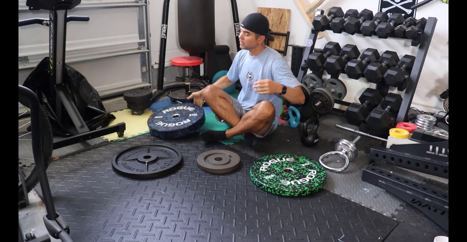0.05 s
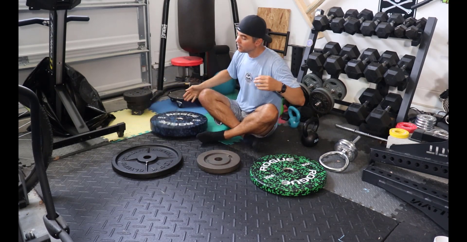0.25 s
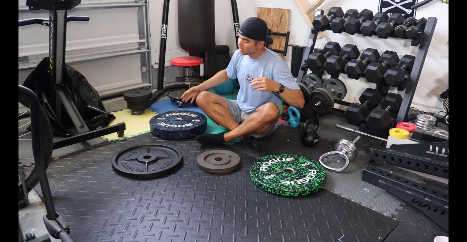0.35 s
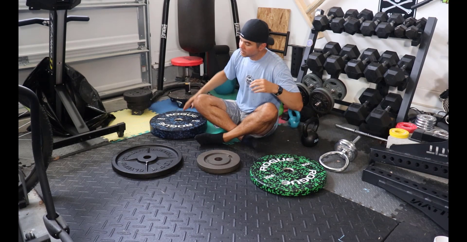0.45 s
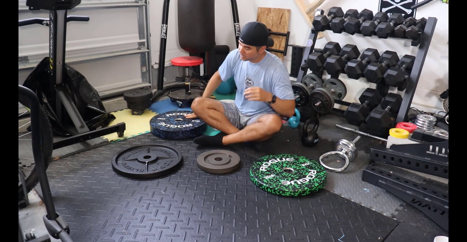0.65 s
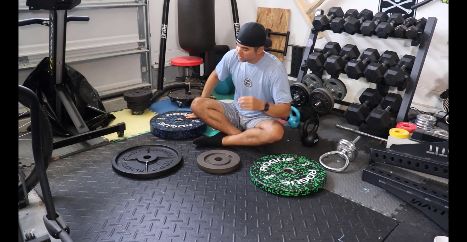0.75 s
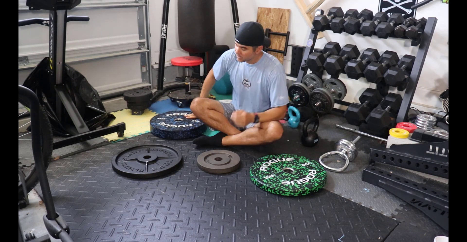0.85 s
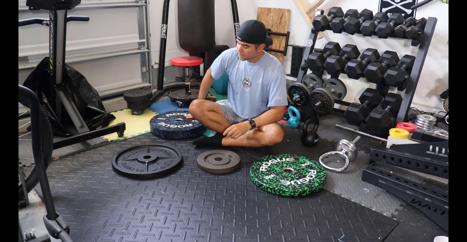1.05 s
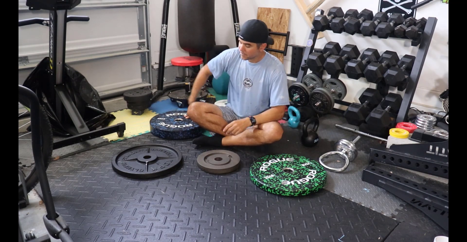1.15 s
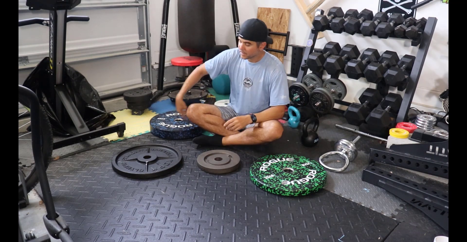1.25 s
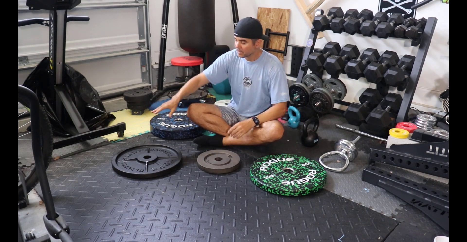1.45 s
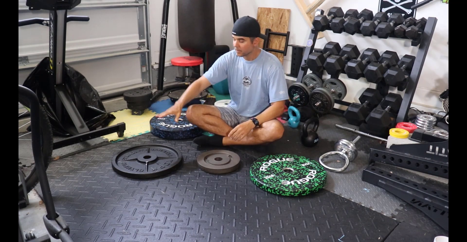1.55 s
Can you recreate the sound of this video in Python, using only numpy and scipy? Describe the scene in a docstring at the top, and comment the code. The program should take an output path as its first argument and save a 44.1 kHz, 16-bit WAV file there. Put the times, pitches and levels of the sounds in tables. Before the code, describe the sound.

A heavy rubber weight plate lands flat on a rubber floor with one loud, overloaded thud, then a softer double bounce with a small metal tick; garage boom dies away over faint cloth rustle and fan hum.

```python
"""A garage gym: a heavy rubber weight plate falls flat on the rubber floor, bounces and settles.
Soft blows ring the plate's damped modes, the floor shudders, the garage booms and the steel hub ticks.
Clothes rustle as swells of shaped noise; a fan hums in the background as wavering tones over air noise.
The thud overloads the recorder, whose gain control ducks and then climbs back steadily."""
import sys
import numpy as np
from scipy import signal
from scipy.fft import rfft, irfft
from scipy.io import wavfile

SR = 44100
rng = np.random.default_rng(int(sys.argv[2]) if len(sys.argv) > 2 else 0)


def pcm_store(signal):
    """Save signal as 16-bit PCM."""
    levels = np.round(np.clip(np.atleast_2d(signal), -1, 1) * 32767)
    wavfile.write(sys.argv[1], SR, levels.astype(np.int16).T)


N = 70560
T = np.arange(N) / SR   # time [s]


def from_db(db):
    """Decibels to amplitude gain."""
    return 10 ** (np.asarray(db) / 20)


def rms_one(x):
    """Scale to unit rms."""
    return x / np.sqrt(np.mean(x ** 2) + 1e-20)


def at_hz(points, hz):
    """Read a (frequency, value) table along a log-frequency axis."""
    table_hz, values = np.transpose(points)
    return np.interp(np.log(np.maximum(hz, 1)), np.log(table_hz), values)


def noise(colour):
    """Random noise shaped to the given spectrum, rms 1."""
    hz = np.fft.rfftfreq(N, 1 / SR)
    white = rfft(rng.standard_normal(N))
    return rms_one(irfft(white * from_db(at_hz(colour, hz)), N))


def drift(knots_per_s):
    """Slow random wander about 0: straight lines between random knots of spread 1."""
    knots = rng.standard_normal(256)
    return np.interp(T * knots_per_s, np.arange(len(knots)), knots)


def clicks(times, db):
    """One single-sample impulse at each time."""
    out = np.zeros(N)
    np.add.at(out, (np.asarray(times) * SR).astype(int), from_db(db))
    return out


def convolve(x, response):
    """Play x through an impulse response."""
    return signal.fftconvolve(x, response)[:N]


def decay(t60):
    """Exponential decay that falls 60 dB in t60 seconds."""
    return from_db(-60 * T / t60)


def ringing(modes):
    """Resonances as a sum of exponentially dying sines."""
    return sum(from_db(db) * decay(t60) * np.sin(2 * np.pi * hz * T) for hz, db, t60 in modes)


def fan():
    """Steady air noise under hum tones whose loudness and phase waver."""
    # hum tones: (frequency [Hz], rms level [dB])
    hum_tones = [(59.2, -59.5), (139.0, -53), (296.1, -54.5), (376.8, -60), (468.3, -59)]
    # spectrum of the background air: (frequency [Hz], relative level [dB per Hz])
    air_colour = [(25, -16), (49, -5.5), (100, -7), (150, -7), (200, -6.5), (340, -6.5), (450, -11.5),
                  (863, -17.5), (1440, -20), (6000, -30), (14000, -33.5), (16000, -32)]
    air_db = -48   # rms
    waver_depth, waver_per_s = 0.13, 5.05   # loudness spread, random knots per second
    hum = 0
    for hz, db in hum_tones:
        loudness = from_db(db) * np.sqrt(2) * (1 + waver_depth * drift(waver_per_s))
        phase = 2 * np.pi * (hz * T + rng.random()) + drift(waver_per_s)
        hum = hum + loudness * np.sin(phase)
    return hum + from_db(air_db) * noise(air_colour)


def clothes():
    """Cloth slides on cloth: broadband noise in smooth swells as the lifter shifts."""
    # swells: (centre [s], time from centre to 9 dB down [s], peak level [dB])
    swells = [(0.176, 0.059, -51), (0.421, 0.067, -37.5), (0.588, 0.16, -50), (1.076, 0.091, -44),
              (1.374, 0.064, -56.5)]
    # spectrum of the cloth: (frequency [Hz], relative level [dB per Hz])
    cloth_colour = [(400, -18), (900, 2.5), (1500, 4.5), (2400, 4), (4300, 2), (5700, 3), (6800, -5.5),
                    (9500, -5.5), (12000, -18), (16000, -9)]
    loudness = 0
    for centre, half, db in swells:
        loudness = loudness + from_db(db) / np.sqrt(1 + ((T - centre) / half) ** 2) ** 3
    return noise(cloth_colour) * loudness


def plate():
    """Each soft blow sets the plate's heavily damped modes going; near walls send it back."""
    # blows, rim first, then flat, then bouncing and settling: (time [s], level [dB], contact time [s])
    blows = [(0.2258, -21.5, 0.0021), (0.2276, -15, 0.0013), (0.2298, 17.5, .0012),
             (0.23167, 11.5, 0.001178), (0.3884, 2, 0.0014), (0.3981, 0.5, 0.0021), (0.5880, -18.5, 0.0012)]
    # modes of the plate on its mat, before filtering: (frequency [Hz], level [dB], t60 [s])
    plate_modes = [(105, -9, 0.01), (213.5, -21.5, .056), (325.2, -7, 0.17), (563.4, 5.5, .016),
                   (791, 10, 0.049), (1006, -2.5, 0.097), (1469, -8, 0.057), (1754, -20, 0.026)]
    # first reflections from the door and walls: (delay [s], level [dB])
    reflections = [(0.00925, -7.5), (0.0140, -18), (0.0260, -20)]
    radiate_hz = 141   # the plate gives off little below this
    rubber_hz = 1860   # the rubber passes little above this
    force = 0
    for start, blow_db, contact_s in blows:
        push = np.sin(np.pi * np.clip((T - start) / contact_s, 0, 1)) ** 2
        force = force + from_db(blow_db) * push / push.sum()
    body = convolve(force, ringing(plate_modes))
    body = signal.sosfilt(signal.butter(2, radiate_hz, "high", fs=SR, output="sos"), body)
    body = signal.sosfilt(signal.butter(8, rubber_hz, fs=SR, output="sos"), body)
    return body + convolve(body, clicks(*np.transpose(reflections)))


def garage():
    """Dense reflections and standing waves build up after each landing and die away band by band."""
    # landings that set the garage booming: (time [s], level [dB])
    booms = [(0.233, 9.5), (0.390, -3.5), (0.474, -16.5), (0.578, -26)]
    # spectrum of the dense reflections: (frequency [Hz], relative level [dB per Hz])
    room_colour = [(40, -54), (115, 3), (175, -11), (260, -0.5), (350, 0), (480, 4), (720, 1.5),
                   (1000, 2.5), (1130, -5), (1550, -6), (1850, -18), (2200, -30), (3500, -36.5),
                   (8000, -50), (16000, -64)]
    # how long the reflections last: (frequency [Hz], t60 [s])
    room_t60 = [(60, 0.6), (250, 0.55), (600, .62), (1500, 0.55), (4000, 0.78), (12000, 1)]
    # standing waves: (frequency [Hz], level [dB], t60 [s])
    standing_waves = [(118, -42, .9), (242, -28, 0.98), (425, -15, 0.5), (545, -23.5, 0.99),
                      (585.5, -21.5, 0.75), (970, -11.5, 0.53), (1030, -20.5, 0.34)]
    build_s = 0.011   # time for the boom to swell up
    spectrum = rfft(noise(room_colour))
    hz = np.fft.rfftfreq(N, 1 / SR)
    centres = np.geomspace(40, 16000, 10)   # overlapping bands [Hz]
    tail = ringing(standing_waves)
    for centre, share in zip(centres, np.eye(len(centres))):
        # each band is a triangle that meets zero at its neighbours' centres
        band = irfft(spectrum * at_hz(np.c_[centres, share], hz), N)
        tail = tail + band * decay(at_hz(room_t60, centre))
    build_up = 1 - np.exp(-(T / build_s) ** 2)
    return convolve(clicks(*np.transpose(booms)), tail * build_up)


def floor():
    """The weight shakes the floor, whose low modes shudder as the plate lands and settles."""
    # shakes: (time [s], level [dB])
    shakes = [(0.26, -10.5), (0.493, -16.5), (0.588, -31.5)]
    # modes of the floor: (frequency [Hz], level [dB], t60 [s])
    floor_modes = [(43, -11.5, .5), (57, -12, 0.97), (82.5, -1.5, .3)]
    return convolve(clicks(*np.transpose(shakes)), ringing(floor_modes))


def hub():
    """The steel hub ticks as the plate lands again: short bright bursts of dying noise."""
    # ticks: (time [s], level [dB])
    ticks = [(0.3762, -15), (0.3897, -8.5)]
    # spectrum of a tick: (frequency [Hz], relative level [dB])
    tick_colour = [(2000, 5.5), (3200, -15), (4400, 1.5), (6500, -21), (10000, -6.5), (16000, -37)]
    tick_t60_s = 0.018
    burst = noise(tick_colour) * decay(tick_t60_s)
    return convolve(clicks(*np.transpose(ticks)), burst)


def scene():
    """Everything at the microphone, as one channel."""
    return (plate() + floor() + garage() + hub() + clothes() + fan())[None]


def record(dry):
    """Gain control acts too late for the thud, which clips; the gain then climbs back steadily."""
    limit_db, detect_s, attack_s, release_db_per_s = -8.5, 0.003, 0.011, 70
    clip_db, clip_knee = -2.5, 14   # overload ceiling, sharpness of its corner
    treble_hz, cutoff_hz = 11740, 17100   # gentle treble roll-off, steep upper limit
    keep = np.exp(-1 / (detect_s * SR))
    power = signal.lfilter([1 - keep], [1, -keep], dry[0] ** 2)
    level_db = 10 * np.log10(power + 1e-12)
    excess_db = np.maximum(level_db - limit_db, 0)
    # adding the release slope before the running peak makes the held peak fall at that slope
    slope_db = release_db_per_s * T
    held_db = np.maximum.accumulate(excess_db + slope_db) - slope_db
    keep = np.exp(-1 / (attack_s * SR))
    reduction_db = signal.lfilter([1 - keep], [1, -keep], held_db)
    ducked = dry * from_db(-reduction_db)
    overload = np.abs(ducked / from_db(clip_db))
    clipped = ducked / (1 + overload ** clip_knee) ** (1 / clip_knee)
    dulled = signal.sosfilt(signal.butter(2, treble_hz, fs=SR, output="sos"), clipped)
    return signal.sosfilt(signal.cheby2(12, 70, cutoff_hz, fs=SR, output="sos"), dulled)


dry = scene()
out = record(dry)
pcm_store(out)
```